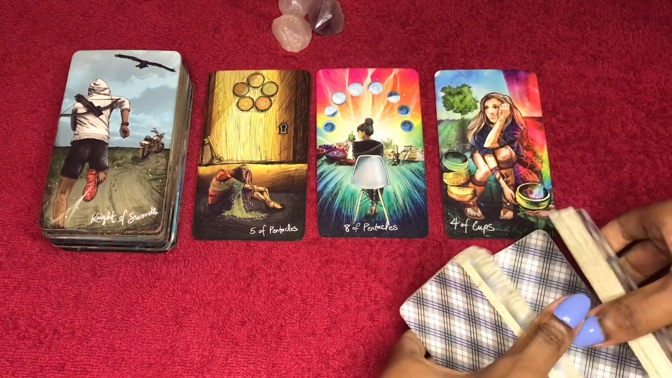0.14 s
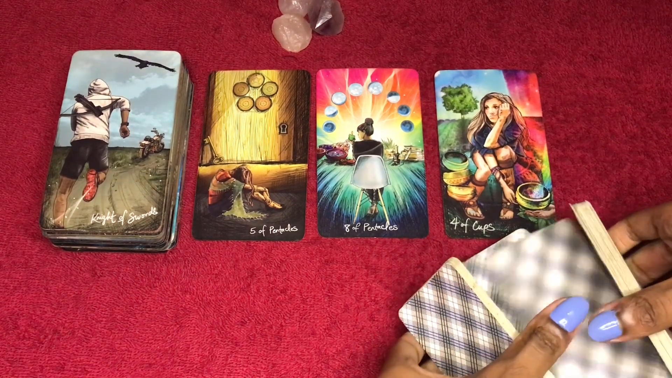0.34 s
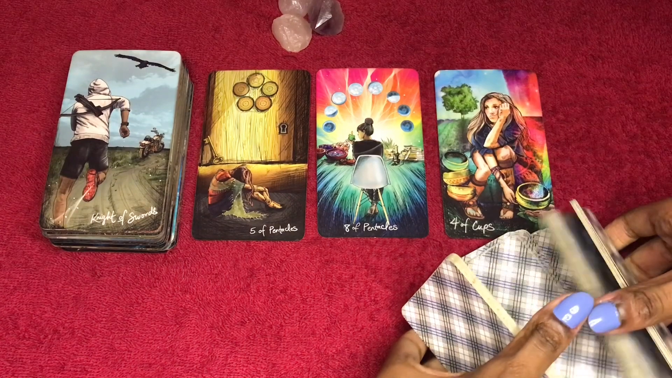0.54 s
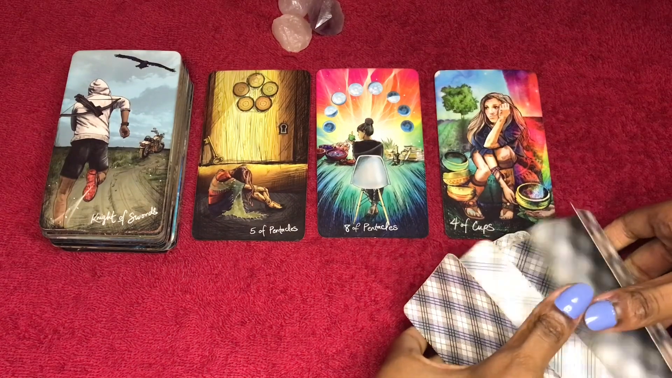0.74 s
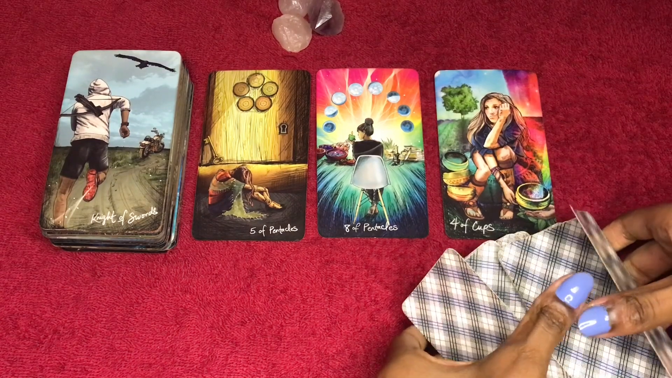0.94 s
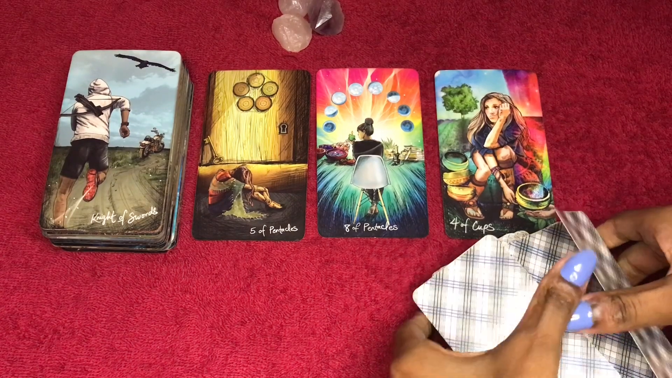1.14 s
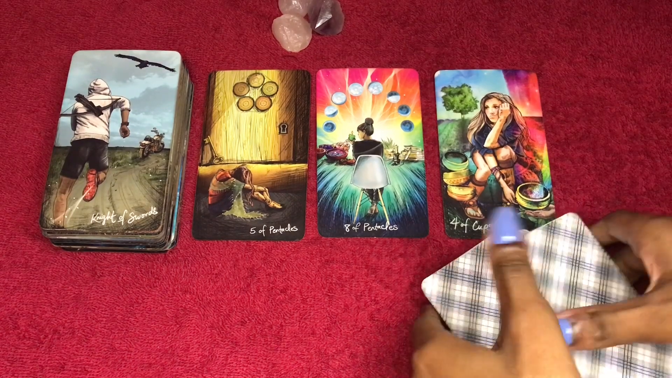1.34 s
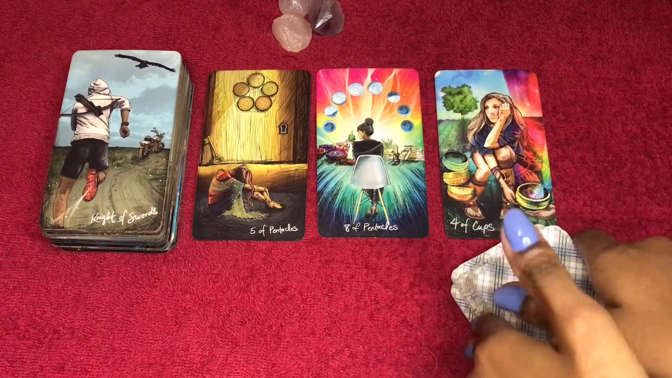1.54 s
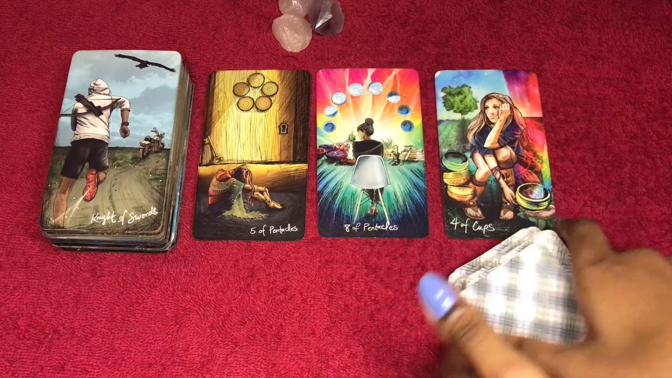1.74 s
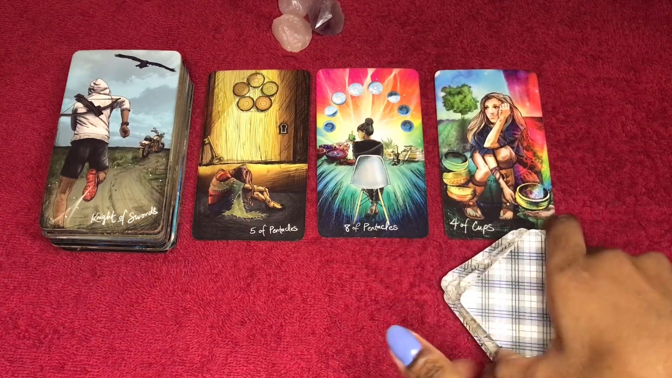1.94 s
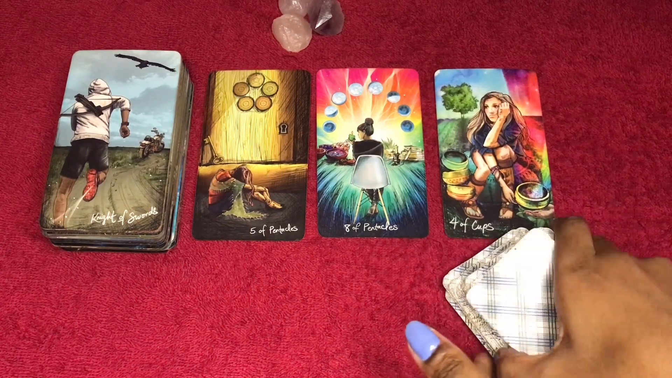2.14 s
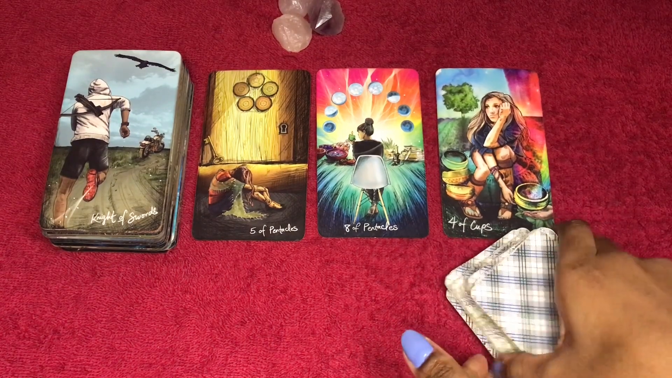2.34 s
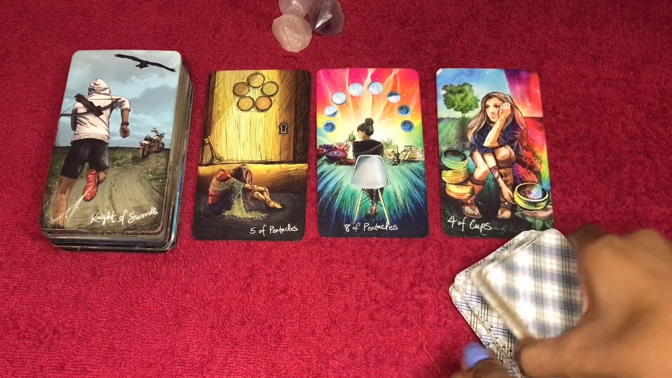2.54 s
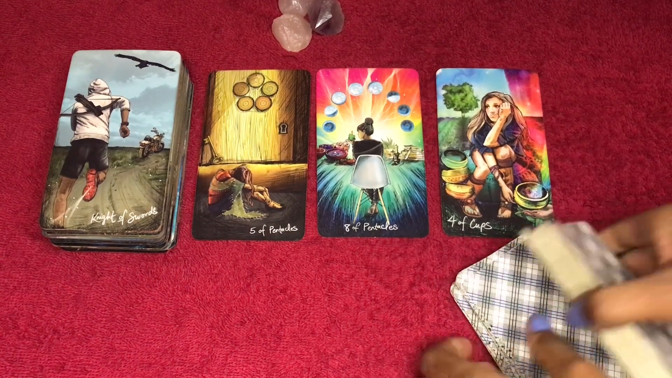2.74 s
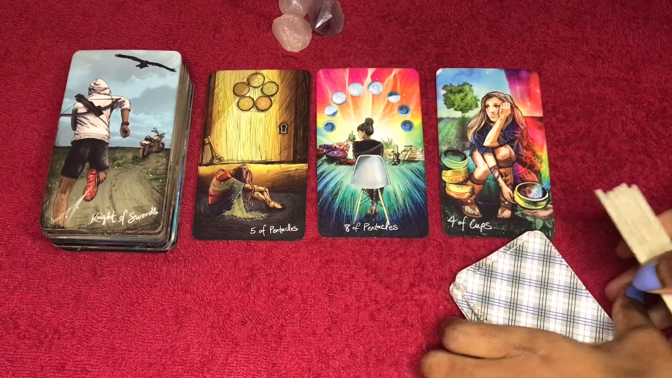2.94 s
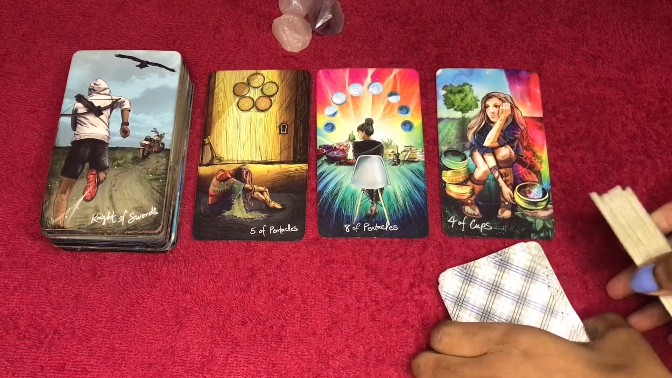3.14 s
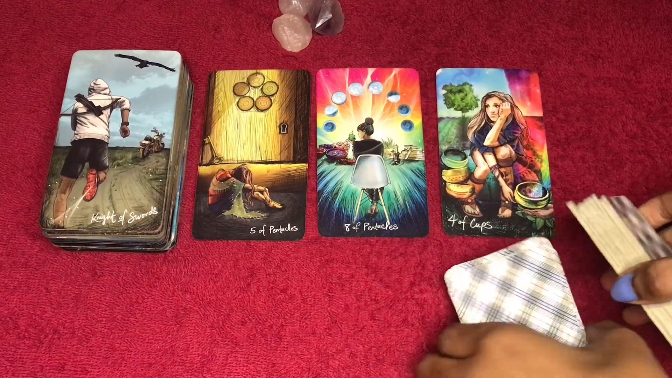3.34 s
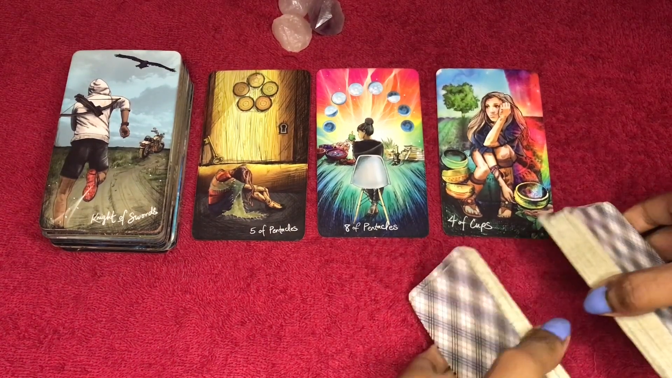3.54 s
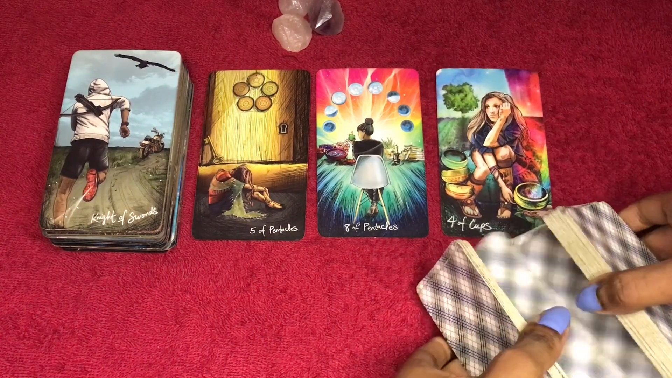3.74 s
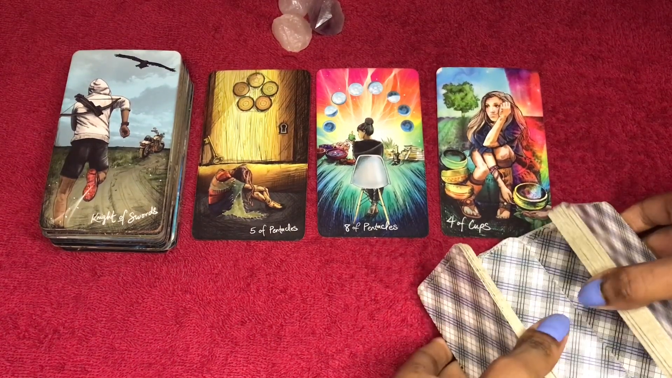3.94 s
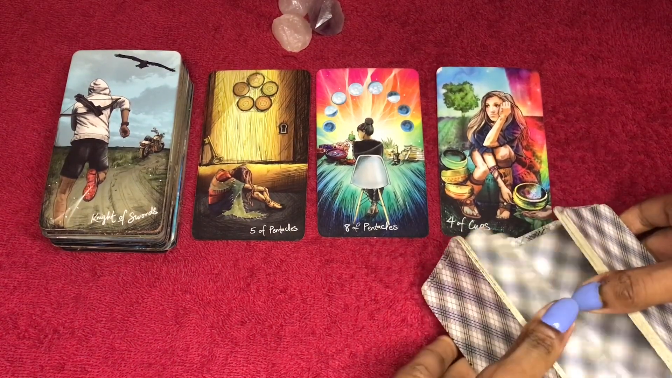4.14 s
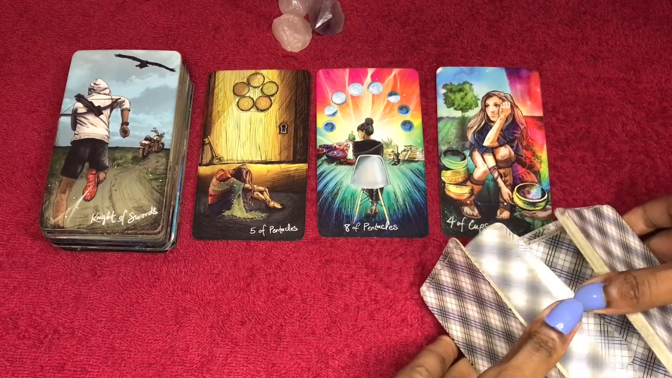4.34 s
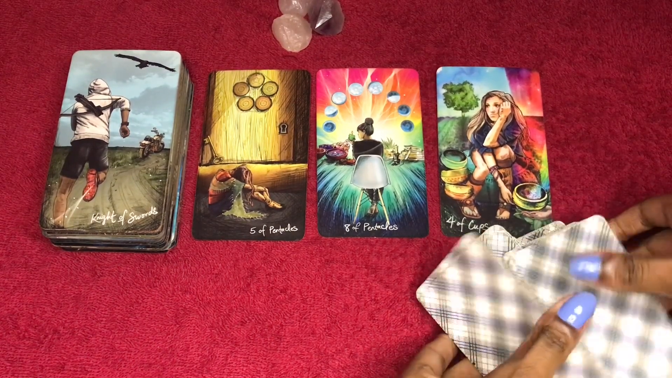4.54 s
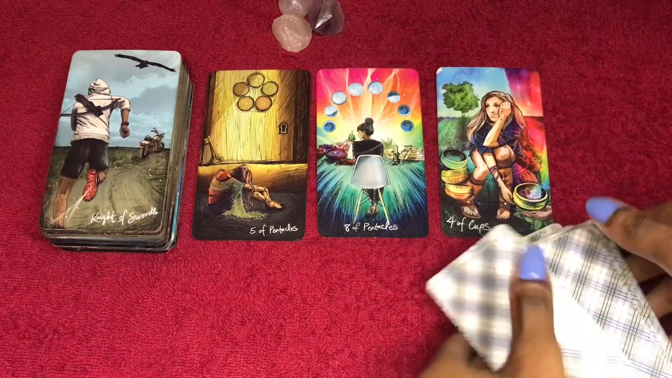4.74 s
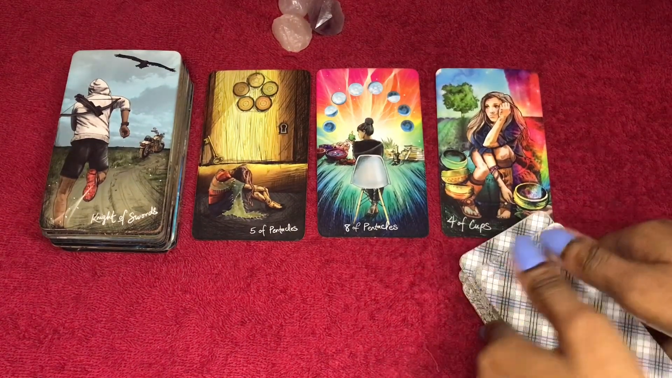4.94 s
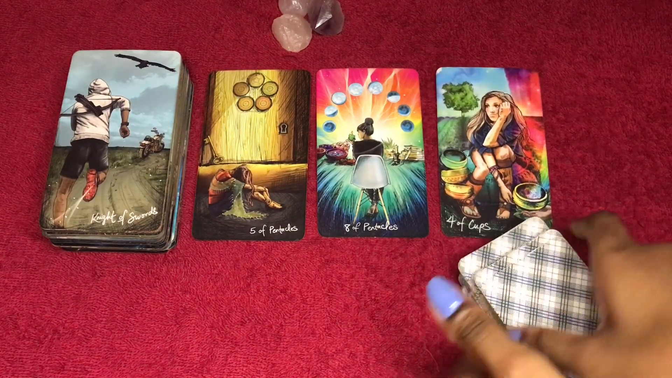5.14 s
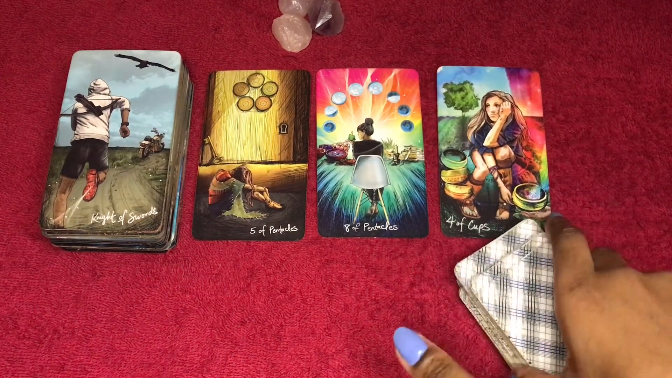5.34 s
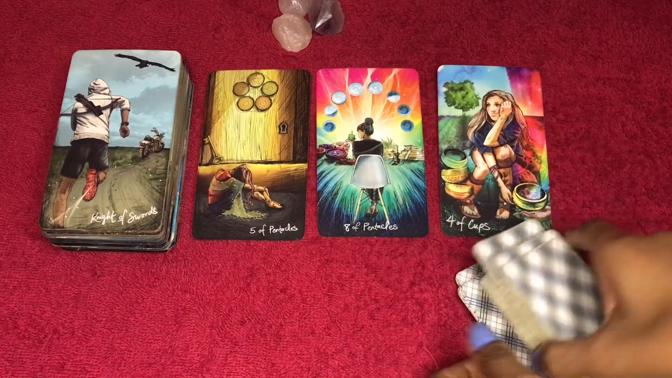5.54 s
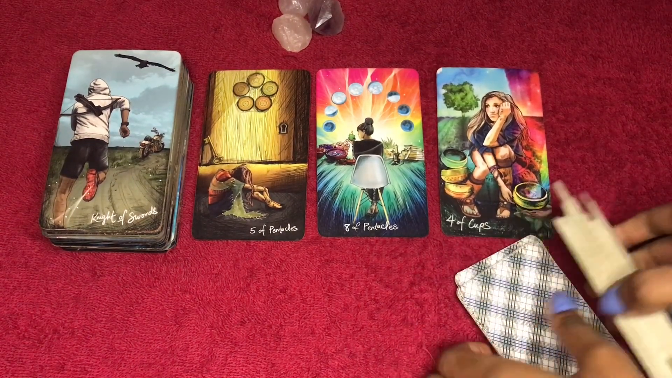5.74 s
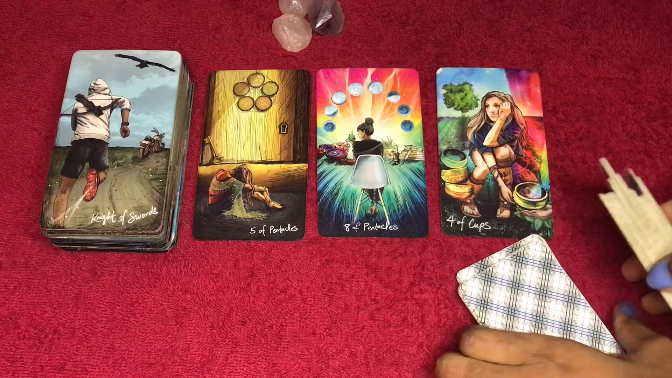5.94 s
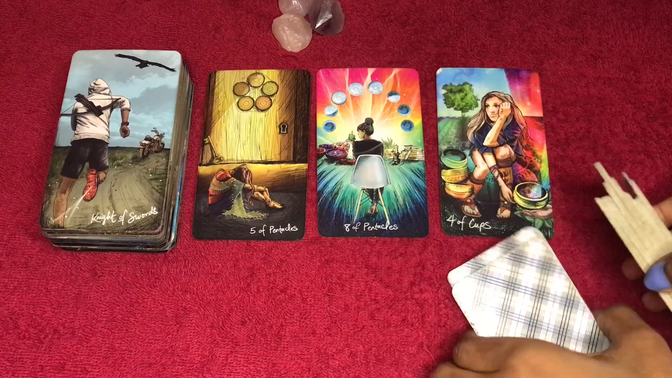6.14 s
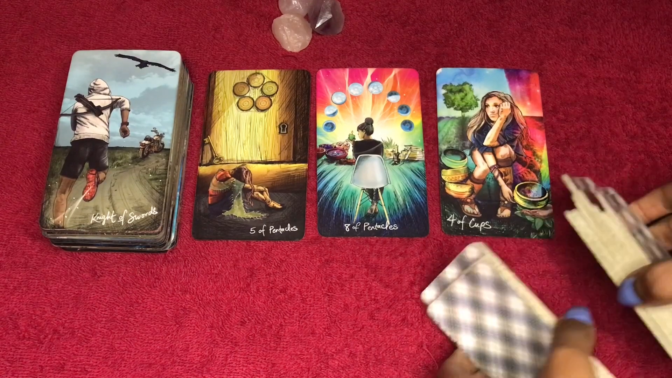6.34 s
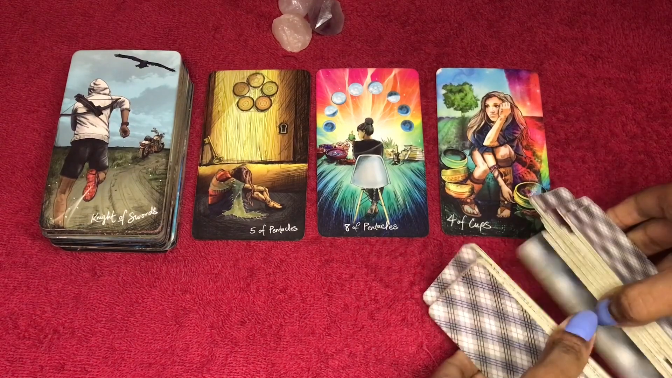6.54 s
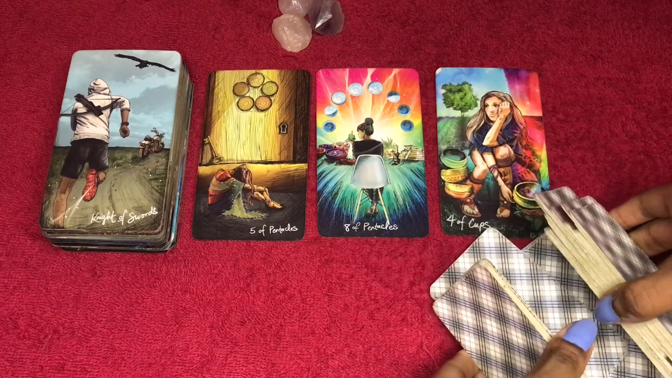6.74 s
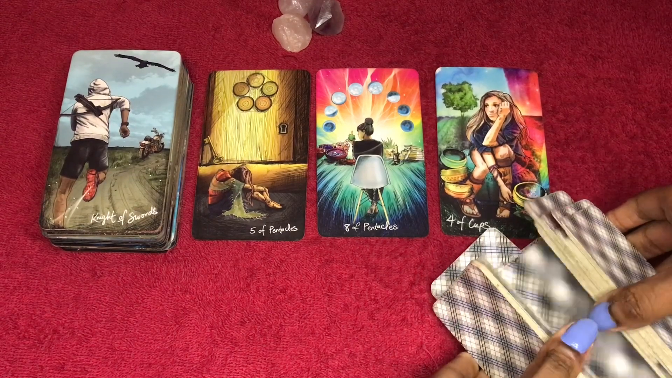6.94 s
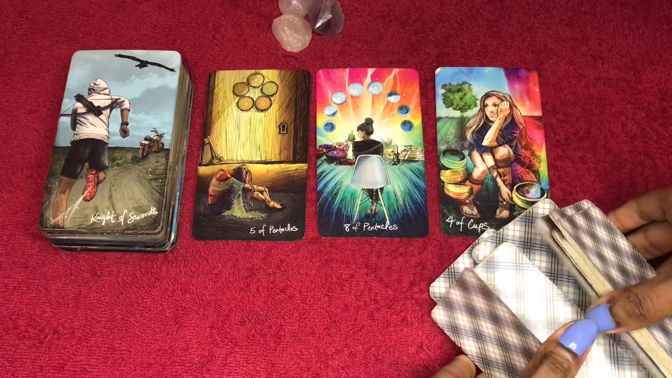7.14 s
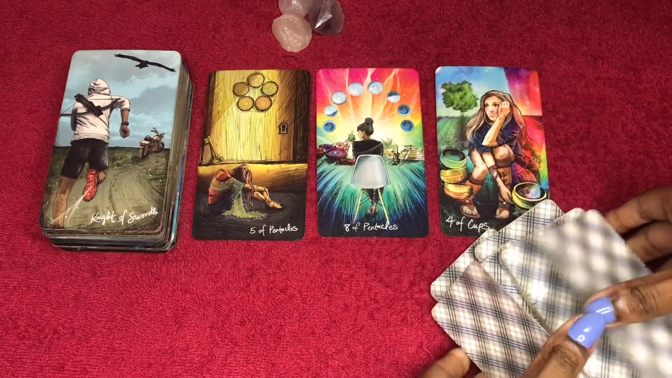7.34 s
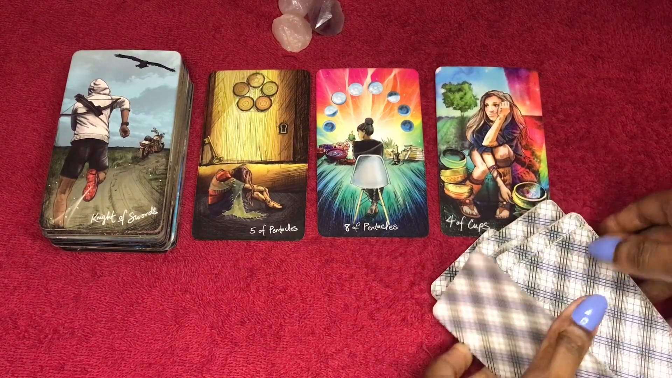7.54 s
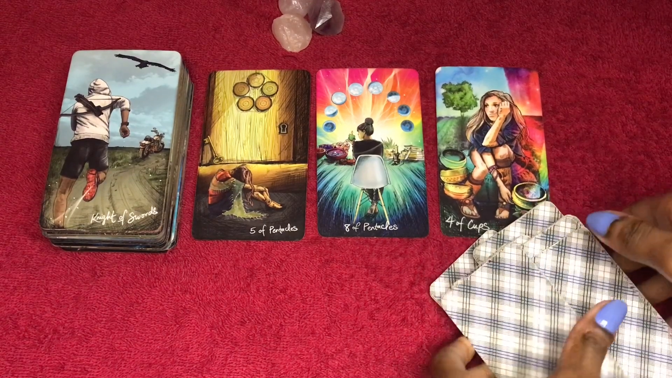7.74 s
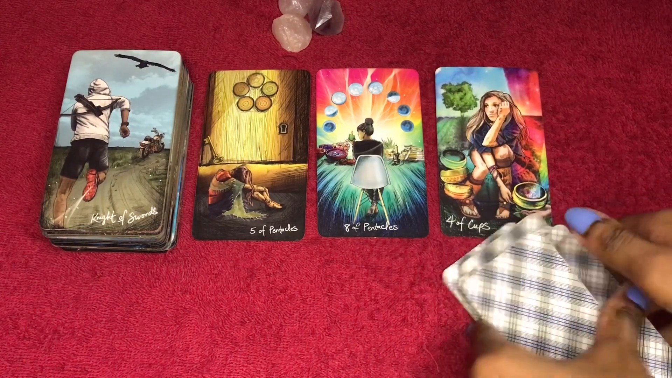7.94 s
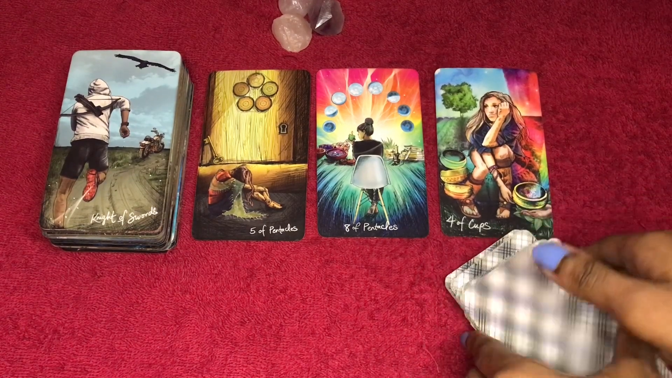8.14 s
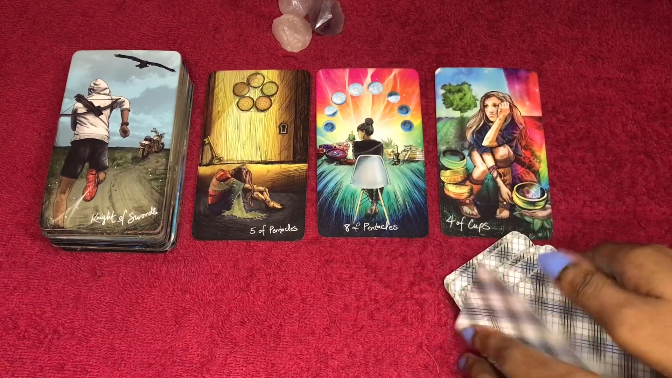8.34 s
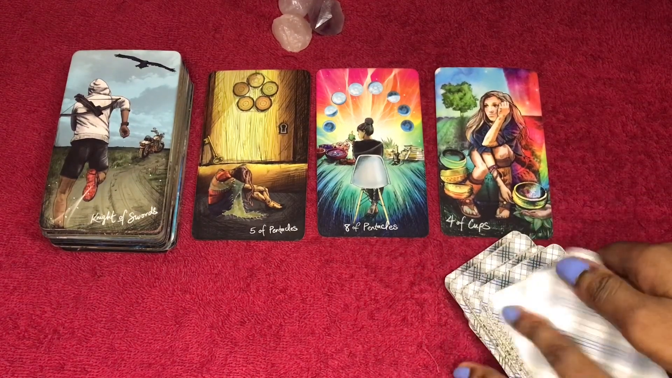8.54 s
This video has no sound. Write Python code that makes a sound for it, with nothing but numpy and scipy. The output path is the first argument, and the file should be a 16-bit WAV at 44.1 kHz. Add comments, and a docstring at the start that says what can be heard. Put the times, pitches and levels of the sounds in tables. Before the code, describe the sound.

Close microphone in a small quiet room. Stiff cards are shuffled overhand just above a cloth-covered table: crisp edge snaps, airy packet slaps and dull low thuds come in three uneven bursts. Between them are soft sliding, a couple of tiny squeaks and near-silence. Finally the deck is pushed together with rubbing and a hard cluster of clicks, over faint hiss and low rumble.

```python
"""At a cloth-covered table in a small quiet room, a deck of stiff cards is shuffled overhand just above the
cloth, in three rounds, then squared up; the microphone is close.
Edges snap as noise bursts through a bending resonance; packets slap the pile as sinking air pops plus claps.
The table thuds as a low damped sine plus a dull knock; sliding faces rub, and a few squeak, as grainy noise.
Tiny ticks fill in, the room answers, and steady noise, a wavering rumble and one faint hum lie beneath."""
import sys
import numpy as np
from scipy import signal
from scipy.fft import rfft, irfft
from scipy.io import wavfile
from scipy.ndimage import uniform_filter1d

SR = 44100
rng = np.random.default_rng(int(sys.argv[2]) if len(sys.argv) > 2 else 0)


def master_out(mix):
    """Clip the mix to full scale and print it as 16-bit PCM to the path in sys.argv[1]."""
    frames = np.transpose(np.atleast_2d(mix))
    ceiling = np.clip(frames, -1, 1)
    pcm = np.round(ceiling * 32767).astype(np.int16)
    wavfile.write(sys.argv[1], SR, pcm)


N = 378819

# packet drops, levels before each layer's trim:
# start_s, edge_db, ring_hz, treble_db (against edge), slap_db, pop_hz (at onset), thud_db
PACKET_DROPS = [(0.267, -30.5, 2480, -6.5, -34, 690, -21.5), (0.3797, -35, 2400, -5, -20.5, 690, -32),
                (0.6353, -30, 3940, -9.5, -33, 390, -35), (0.7738, -27, 1610, -12, -22, 870, -27),
                (0.7869, -39.5, 1710, -17, -32, 604, -48), (0.803, -32, 1800, 0, -33.5, 680, -42),
                (1.1246, -27.5, 6000, -2.5, -32, 695, -44.5), (1.3596, -27, 4200, -11, -38, 444, -50),
                (3.721, -45, 1590, -11, -32, 478, -28.5), (3.772, -24.5, 3320, -7, -37.5, 840, -23.5),
                (3.8182, -33, 1570, -9.5, -28, 770, -24.5), (4.1493, -29.5, 2320, -3, -25.5, 726, -26.5),
                (4.1703, -24.5, 1900, -11, -27, 650, -40), (4.2055, -21, 3580, 0, -29, 565, -28.5),
                (4.2272, -46, 2000, -8, -33, 615, -35), (4.411, -44, 1600, -19, -30.5, 560, -41),
                (4.483, -37, 3000, 3, -29, 560, -33), (4.492, -36, 1700, -6.5, -34, 540, -47),
                (4.527, -27.5, 3750, -16, -32, 516, -37), (6.62, -41.5, 1900, -7, -39, 560, -25),
                (6.70, -43, 1590, -7, -25.5, 414, -25), (6.9371, -34, 1600, -7, -30.5, 354, -34),
                (6.952, -27.5, 3720, -6.5, -29, 443, -28.5), (7.0927, -27.5, 1760, -7.5, -27, 570, -26.5),
                (7.1527, -28, 6240, -5.5, -41, 810, -32.5), (7.2325, -24.5, 2820, 0, -33.5, 755, -32.5),
                (7.3257, -39, 4000, -9, -34, 327, -26), (7.3383, -31.5, 3050, -11, -36, 860, -47),
                (7.4155, -58, 1700, -10, -39.5, 620, -40)]
# radiation of a card's body: freq_hz, gain_db
BODY_RESPONSE = [(300, -6), (700, 2), (1100, -4.5), (1600, 0), (2500, -1), (4000, 2), (6200, -4),
                 (8000, -28.5)]
# treble of sliding faces, before tilt: freq_hz, gain_db
HISS_RESPONSE = [(4500, -23.5), (6300, 2), (7600, -4.5), (9000, -0.5), (10500, -5.5), (13000, -1.5),
                 (16000, -9)]
# loose clap of a packet: freq_hz, gain_db
CLAP_RESPONSE = [(80, -16.5), (200, 2), (320, -1.5), (750, 3.5), (1200, -6.5), (2000, -14), (4000, -33.5)]

BLOW_S = .005  # reference duration of a blow's level


def undb(db):
    """Decibels to gain."""
    return 10 ** (np.asarray(db) / 20)


def clock(seconds):
    """Sample times from zero."""
    return np.arange(int(seconds * SR)) / SR


def unit(x):
    """Scale to rms 1."""
    return x / np.sqrt(np.mean(x ** 2) + 1e-20)


def blow(x, db):
    """Give a short sound the energy of BLOW_S seconds at this rms level."""
    energy = np.sum(x ** 2) + 1e-20
    return x * undb(db) * np.sqrt(BLOW_S * SR / energy)


def add(track, start_s, x):
    """Mix x into the track from start_s."""
    start = int(np.clip(start_s * SR, 0, N - 1))
    track[start:start + len(x)] += x[:N - start]


def band(x, lo_hz, hi_hz):
    """Keep one band."""
    return signal.sosfilt(signal.butter(3, [lo_hz, hi_hz], "band", fs=SR, output="sos"), x)


def colour(x, points, size=1024):
    """Causal minimum-phase filter through (Hz, dB) points, from the folded cepstrum."""
    hz, db = np.transpose(points)
    curve_db = np.interp(np.log(np.fft.rfftfreq(size, 1 / SR) + 1), np.log(hz), db)
    cepstrum = irfft(np.log(undb(curve_db)))
    cepstrum[1:size // 2] *= 2
    cepstrum[size // 2 + 1:] = 0
    impulse = irfft(np.exp(rfft(cepstrum)))
    return signal.fftconvolve(x, impulse)[:len(x)]


def resonate(x, hz, q):
    """One resonance, gain 1 at its centre."""
    b, a = signal.iirpeak(min(hz, SR / 3), max(q, 1), fs=SR)
    return signal.lfilter(b, a, x)


def card(drive, ring_hz, q, broad_db):
    """A card's bending resonance, set by the grip, over its broad response."""
    bending = resonate(drive, ring_hz, q)
    return colour(bending + undb(broad_db) * drive, BODY_RESPONSE)


def sizzle(drive, points, treble_db, soften):
    """The treble of a contact: the weaker it is, the faster it falls with pitch (soften: dB/octave per dB)."""
    tilted = [(hz, db + soften * treble_db * np.log2(hz / points[0][0])) for hz, db in points]
    return colour(drive, tilted)


def edges(trailing=2, gap_s=.0035, trail_db=-17, spread_db=2.2, centre_hz=2970):
    """Every edge that snaps, as (s, dB, ring Hz, treble dB): single cards, packets and their trailing cards."""
    # single cards flicking past a neighbour: start_s, level_db, ring_hz, treble_db (against level)
    single_snaps = [(1.3545, -33, 2390, -12), (1.512, -42.5, 3220, -11), (1.5277, -40.5, 3330, -13),
                    (1.9162, -44, 2550, -9), (3.6598, -50, 3500, 6), (4.6282, -33, 2500, -6),
                    (4.6413, -43.5, 4140, 7), (6.68, -47.5, 3970, -4), (7.0097, -44.5, 5300, -2),
                    (7.0565, -42, 3600, -3), (7.0652, -38.5, 2400, -11), (7.3594, -34, 1800, -9.5),
                    (7.9275, -26, 3000, -15.5), (7.9659, -33, 4160, -16), (7.9716, -26.5, 3000, -5.5),
                    (8.1595, -25, 3200, -8), (8.1653, -20.5, 3100, -4), (8.1992, -34, 3200, -14),
                    (8.2125, -23.5, 6200, -5), (8.2728, -28, 3270, -3), (8.356, -32.5, 3550, -7),
                    (8.5804, -39, 2800, -9)]
    rows = list(single_snaps)
    for start_s, db, ring_hz, treble_db, *_ in PACKET_DROPS:
        rows.append((start_s, db, ring_hz, treble_db))
        for late, size, grip in rng.standard_normal((trailing, 3)):
            start_s += gap_s * np.exp(late / 2)  # gap_s is the median gap
            trail_level_db = db + trail_db + spread_db * size
            rows.append((start_s, trail_level_db, centre_hz * 2 ** (grip / 2), treble_db))
    return rows


def snap_decay_s(db, ring_hz):
    """A snap of -30.5 dB at 2970 Hz dies in 1.2 ms; harder and stiffer ones die sooner."""
    return .0012 * undb(-30.5 - db) ** 0.26 * (2970 / ring_hz) ** 0.62


def snaps(crack=1.7, chatter_db=-24, chatter_s=0.003, slip_db=-16, slip_s=0.00082, width_hz=1100, pile_db=-23):
    """An edge starts to slip, springs free with a crack and chatters briefly against its neighbours."""
    # radiation of a card's edge, before tilt: freq_hz, gain_db
    edge_response = [(4500, -24.5), (6300, 0.5), (7600, -3), (9000, -1.5), (10500, -6.5), (12500, -8.5),
                     (16000, -12)]
    out, lead = np.zeros(N), SR // 200
    t = clock(.03) - lead / SR  # release at 0
    after = np.maximum(t, 0)
    slip = undb(slip_db) * np.exp(-np.abs(t) / slip_s)
    chatter = undb(chatter_db) * np.exp(-after / chatter_s)
    for start_s, db, ring_hz, treble_db in edges():
        release = np.exp(-after / snap_decay_s(db, ring_hz)) + chatter
        drive = rng.standard_normal(len(t)) * np.where(t < 0, slip, release)
        drive[lead] += crack
        body = blow(card(drive, ring_hz, ring_hz / width_hz, broad_db=-7.5), db)
        edge = blow(sizzle(drive, edge_response, treble_db, soften=0.57), db + treble_db)
        pile = blow(colour(drive, CLAP_RESPONSE), db + pile_db)
        add(out, start_s + t[0], body + edge + pile)
    return out


def slaps(pop_db=-2.5, pop_cycles=0.56, sag=0.025, clap_db=-2.5, clap_s=0.0055):
    """Air squeezed from under a packet pops at a sinking pitch; the loose cards clap with it and ring on."""
    out, t = np.zeros(N), clock(.05)
    for start_s, *_, db, pop_hz, _ in PACKET_DROPS:
        turn = np.log1p(sag * pop_hz * t) / sag
        pop = np.sin(2 * np.pi * turn) * turn * np.exp(-turn / pop_cycles)
        clap = colour(rng.standard_normal(len(t)) * np.exp(-t / clap_s), CLAP_RESPONSE)
        add(out, start_s, blow(pop, db + pop_db) + blow(clap, db + clap_db))
    return out


def thuds(table_hz=70.8, lag_s=0.00606, thud_db=-1, cycles=0.4, ring_db=-19, ring_s=0.14,
          knock_db=-6, knock_s=.018, scatter=0.148):
    """The padded table gives once, just after the packet lands, then rings faintly, with a dull knock on top."""
    # a hand comes to rest on the table: start_s, level_db (before trim)
    hand_rests = [(1.93, -40), (3.073, -33.5), (4.827, -39.5)]
    # dull knock of the table top: freq_hz, gain_db
    knock_response = [(35, -17), (110, 4), (260, -6), (500, -24), (1500, -47)]
    out, t = np.zeros(N), clock(.3)
    landings = [(start_s + lag_s, db) for start_s, *_, db in PACKET_DROPS]
    for start_s, db in landings + list(hand_rests):
        turn = table_hz * np.exp(scatter * rng.standard_normal()) * t
        give = turn / cycles * np.exp(1 - turn / cycles)
        swell = give + undb(ring_db) * np.exp(-t / ring_s)
        thud = np.sin(2 * np.pi * turn) * swell
        knock = colour(rng.standard_normal(len(t)) * np.exp(-t / knock_s), knock_response)
        add(out, start_s, blow(thud, db + thud_db) + blow(knock, db + knock_db))
    return out


def friction(t, ring_hz, squeak_q, treble_db, grain_db=6.0, judder_db=2.0, judder_s=0.0027,
             pile_db=-20, broad_db=-2):
    """Tiny catches between two faces drive the card, juddering as it goes."""
    catches, size, wobble = rng.standard_normal((3, len(t)))
    drive = catches * undb(grain_db * size)
    judder = unit(uniform_filter1d(wobble, max(int(judder_s * SR), 1)))
    # the more a stroke squeaks, the more of it goes into the one resonance
    body = unit(card(drive, ring_hz, squeak_q, broad_db - 14 * np.log10(squeak_q)))
    hiss = undb(treble_db) * unit(sizzle(drive, HISS_RESPONSE, np.mean(treble_db), soften=0.69))
    pile = undb(pile_db) * unit(colour(drive, CLAP_RESPONSE))
    return undb(judder_db * judder) * (body + hiss + pile)


def slides(strokes, ring_hz, squeak_q, shape=1.6, rise_share=0.54):
    """Each stroke of friction swells and dies away, its length split between rise and fall."""
    out, t = np.zeros(N), clock(1 / 2) - 1 / 4  # peak at 0
    side = np.where(t < 0, rise_share, 1 - rise_share)
    for peak_s, length_s, db, treble_db in strokes:
        stroke = np.exp(-.5 * np.abs(t / length_s / side) ** shape)
        add(out, peak_s + t[0], undb(db) * stroke * friction(t, ring_hz, squeak_q, treble_db))
    return out


def brushes(lead_s=.004, length_s=.004, brush_db=-16):
    """A packet brushes the pile just before it lands, as (peak s, length s, dB, treble dB)."""
    return [(start_s - lead_s, length_s, slap_db + brush_db, treble_db)
            for start_s, _, _, treble_db, slap_db, *_ in PACKET_DROPS]


def face_slides():
    """One face draws across another, its bending resonance broad."""
    # strokes: peak_s, length_s (envelope scale), level_db, treble_db (against body)
    face_strokes = [(1.485, 0.066, -49, -1), (2.497, 0.031, -57.5, 6), (3.063, 0.022, -57, 6),
                    (4.462, 0.011, -45.5, 4), (4.635, 0.039, -55, -3), (4.81, .06, -48.5, 1.5),
                    (6.03, 0.044, -62, 4), (7.173, .019, -46.5, -1), (7.334, 0.01, -38, -4),
                    (7.965, 0.048, -43, -8), (8.195, .03, -48, -12), (8.3, 0.053, -48, -3)]
    return slides(list(face_strokes) + brushes(), ring_hz=2400, squeak_q=1.5)


def squeaks():
    """A tightly gripped card squeaks at a narrow resonance as the deck is cut."""
    # strokes: peak_s, length_s (envelope scale), level_db, treble_db (against body)
    squeak_strokes = [(1.947, 0.015, -43, -7.5), (2.106, 0.013, -41, -7.5), (2.155, 0.034, -52.5, -3)]
    return slides(squeak_strokes, ring_hz=2400, squeak_q=18)


def squaring(trim_db=-1, ring_hz=2600, squeak_q=2.6, ease_s=.004):
    """Three pushes work the fanned cards into one deck; they rub for as long as the fingers push."""
    # friction along each push: time_s, level_db (before trim), treble_db (against body)
    gather_push = [(7.44, -69, -8), (7.456, -55, -23), (7.528, -49, -4), (7.568, -60, -1),
                   (7.596, -46.5, 0), (7.612, -56.5, 0.5), (7.708, -57, -4), (7.716, -40, -8),
                   (7.732, -59, -8), (7.752, -58, -13), (7.828, -47.5, -4.5), (7.856, -62, -10),
                   (7.92, -49, -9)]
    shove_push = [(8.1, -63, -8), (8.166, -22, -4), (8.176, -37, -1), (8.19, -50, -12)]
    square_push = [(8.37, -55, -6), (8.408, -46.5, 3), (8.448, -55, -6), (8.514, -56, 5.5),
                   (8.54, -43, -0.5), (8.558, -61, -2), (8.59, -38, -8)]
    out = np.zeros(N)
    for push in (gather_push, shove_push, square_push):
        time_s, db, treble_db = np.transpose(push)
        t = time_s[0] + clock(time_s[-1] - time_s[0])
        ease = np.clip(np.minimum(t - t[0], t[-1] - t) / ease_s, 0, 1)
        rub = friction(t, ring_hz, squeak_q, np.interp(t, time_s, treble_db))
        add(out, t[0], ease * undb(np.interp(t, time_s, db) + trim_db) * rub)
    return out


def fidget(floor_db=-66, spread_db=4, decay_s=0.00065, count=36):
    """The held cards shift under the fingers with tiny ticks at random times."""
    out, t = np.zeros(N), clock(.01)
    for when, size in rng.random((count, 2)):
        drive = rng.standard_normal(len(t)) * np.exp(-t / decay_s)
        tick = colour(drive, BODY_RESPONSE) + colour(drive, HISS_RESPONSE)
        add(out, when * N / SR, blow(tick, floor_db - spread_db * np.log(1 - size * 9 / 10)))
    return out


def room(x, build_s=0.0067, bounce_s=.0031, bounce_db=-20, wall_s=0.0087, wall_db=-22):
    """Bounces from two near surfaces, plus a short diffuse tail whose top treble dies first."""
    # diffuse return: centre_hz, share_db, t60_s
    room_bands = [(60, -4.5, 0.32), (150, -14.5, 0.61), (670, -8.5, 0.22), (1510, -8.5, 0.3),
                  (3500, -16, 0.3), (8000, -17, 0.31), (15000, -16.5, 0.14)]
    t = clock(.5)
    response = np.zeros(len(t))
    centre_hz, shares_db, t60s = np.transpose(room_bands)
    limits_hz = np.geomspace(40, 17000, 10)
    for lo_hz, hi_hz in zip(limits_hz, limits_hz[1:]):
        middle = np.log(lo_hz * hi_hz) / 2
        share_db = np.interp(middle, np.log(centre_hz), shares_db)
        t60_s = np.interp(middle, np.log(centre_hz), t60s)
        fade = np.exp(-np.log(1000) * t / t60_s) * (1 - np.exp(-t / build_s))
        fade /= np.sqrt(np.sum(fade ** 2))
        response += undb(share_db) * band(rng.standard_normal(len(t)), lo_hz, hi_hz) * fade
    response[int(bounce_s * SR)] += undb(bounce_db)
    response[int(wall_s * SR)] += undb(wall_db)
    return x + signal.fftconvolve(x, response)[:N]


def quiet(steady_db=-50.61, rumble_db=-64, waver_db=5.0):
    """Steady room rumble and microphone hiss, over a low band of noise that wavers slowly."""
    # steady noise, relative spectrum: freq_hz, density_db (per Hz)
    noise_spectrum = [(13, -40), (22, -48), (52, 3), (125, -4), (152, -6.5), (302, -11), (469, -14.5),
                      (510, -10.5), (554, -13), (1270, -19), (1380, -20.5), (1620, -21.5), (10300, -32),
                      (14700, -28.5), (16000, -36)]
    steady = undb(steady_db) * unit(colour(rng.standard_normal(N), noise_spectrum, size=16384))
    knots = rng.standard_normal(size=32)
    waver = np.interp(np.arange(N), np.linspace(0, N, len(knots)), knots)
    rumble = unit(band(rng.standard_normal(N), 51.5, 78.4))
    return steady + undb(rumble_db + waver_db * waver) * rumble


def hum(pitch_hz=152.2, peak_s=6.46, width_s=0.11, peak_db=-51):
    """A faint low sine swells once in the background under a Gaussian envelope."""
    t = np.arange(N) / SR
    swell = np.exp(-.5 * ((t - peak_s) / width_s) ** 2)
    return undb(peak_db) * swell * np.sin(2 * np.pi * pitch_hz * t)


def scene():
    """Cards and table in the room, over its background."""
    rubbing = face_slides() + squeaks() + squaring()
    handling = snaps() + slaps() + thuds() + rubbing + fidget()
    return (room(handling) + quiet() + hum())[None]


def record(dry, low_hz=36, top_hz=15900):
    """The microphone drops the deepest bass and the recorder cuts the top."""
    thin = signal.sosfilt(signal.butter(2, low_hz, "high", fs=SR, output="sos"), dry)
    return signal.sosfilt(signal.ellip(10, .2, 70, top_hz, fs=SR, output="sos"), thin)


dry = scene()
out = record(dry)
master_out(out)
```